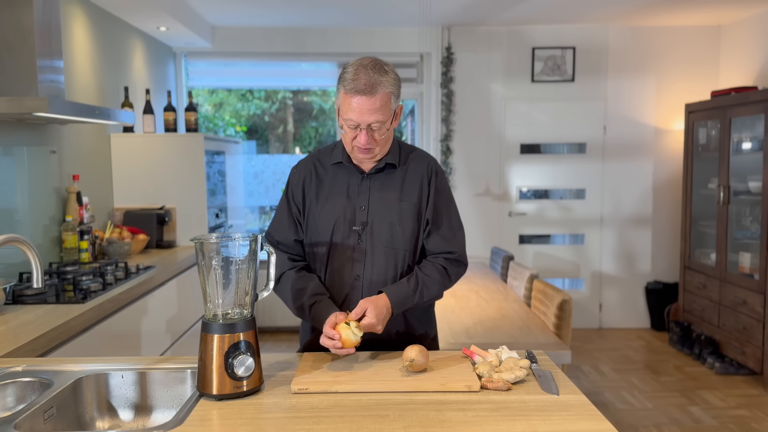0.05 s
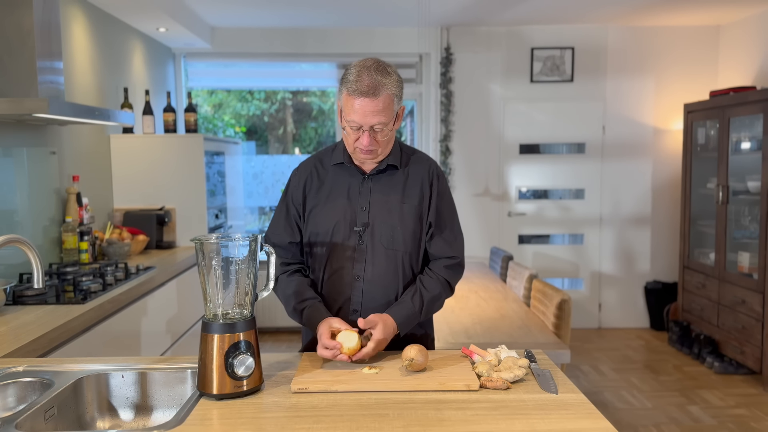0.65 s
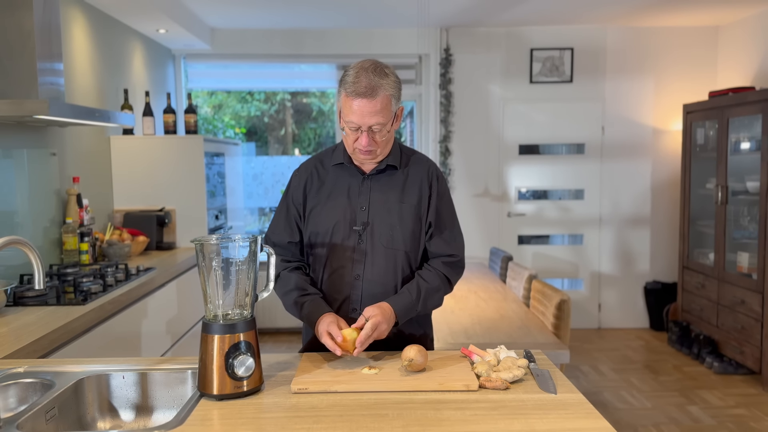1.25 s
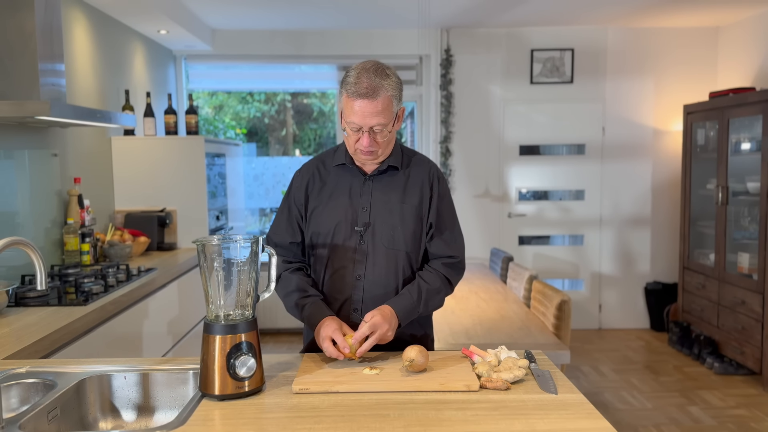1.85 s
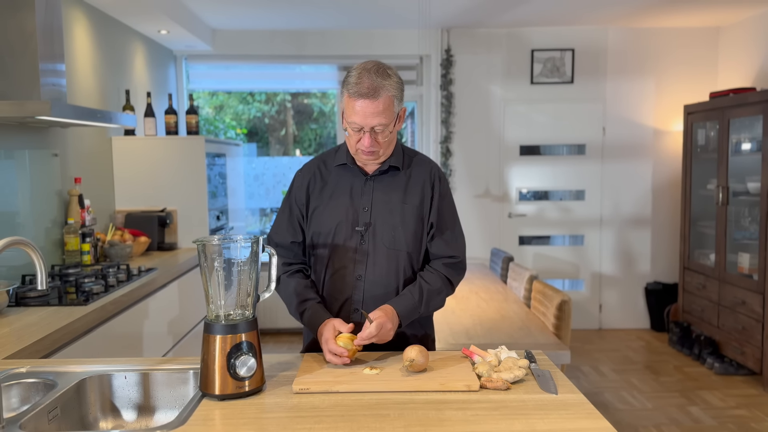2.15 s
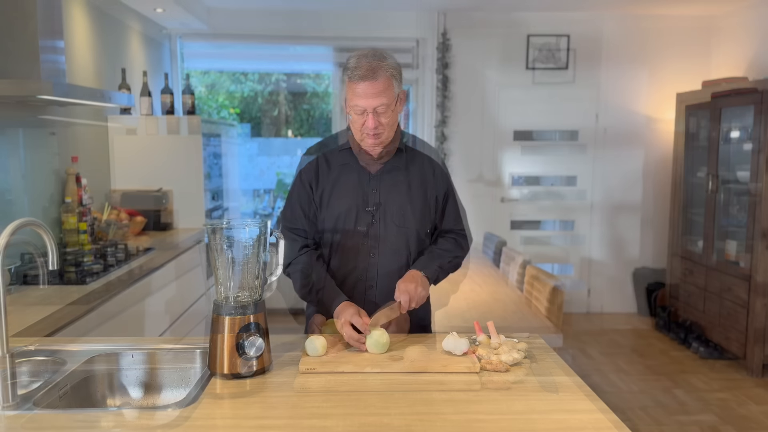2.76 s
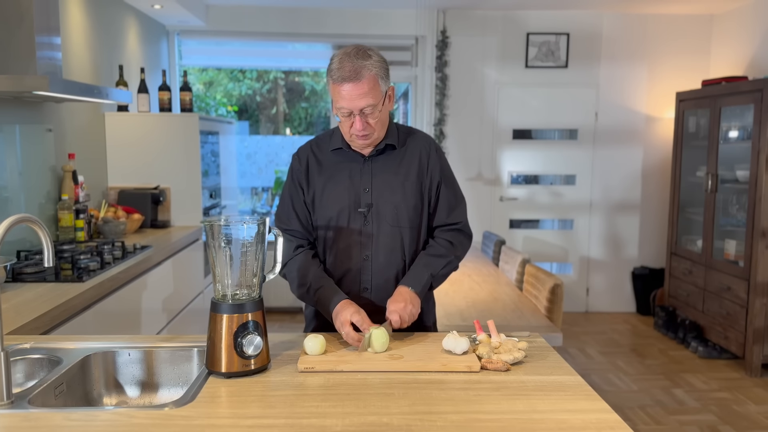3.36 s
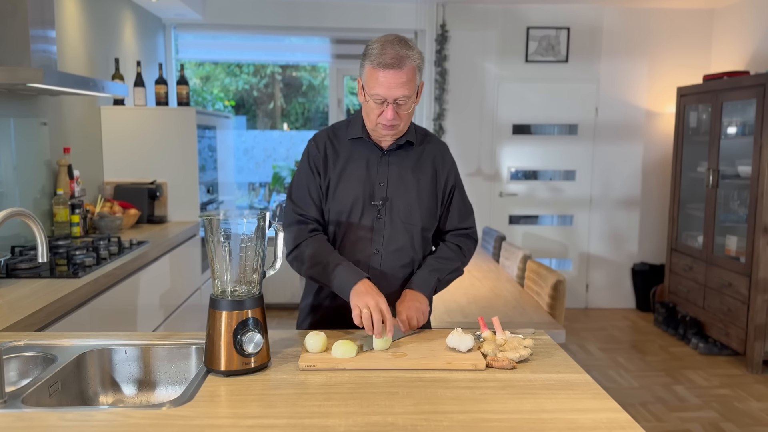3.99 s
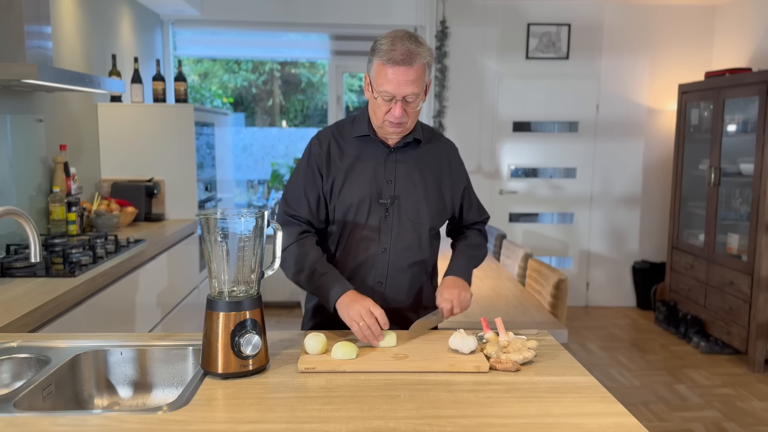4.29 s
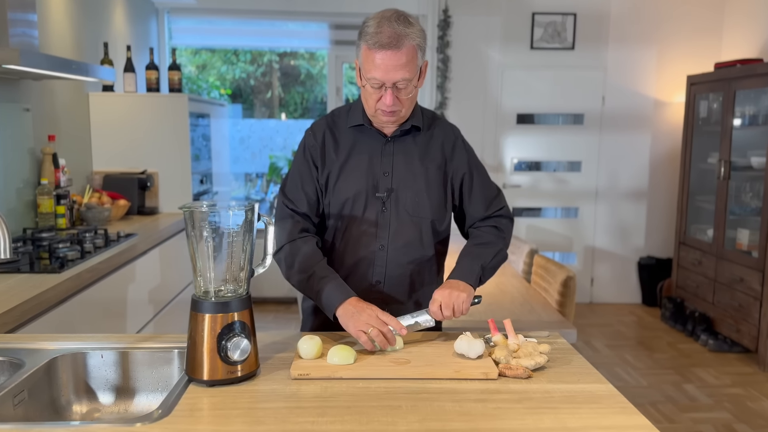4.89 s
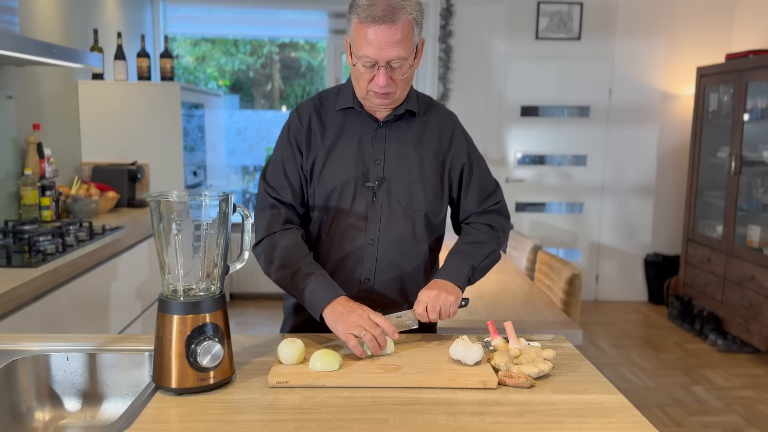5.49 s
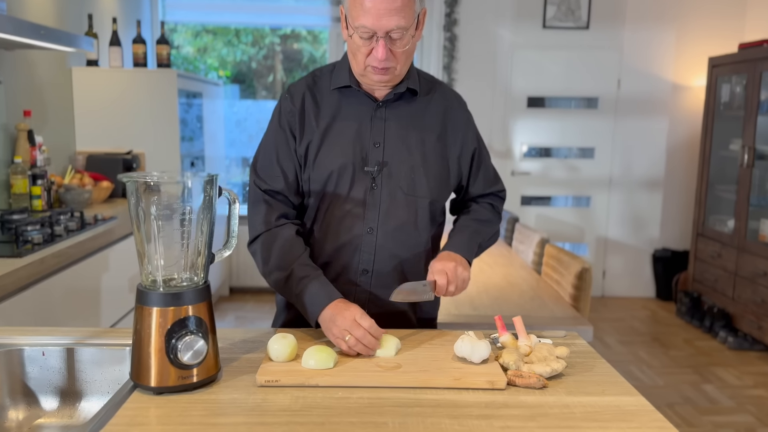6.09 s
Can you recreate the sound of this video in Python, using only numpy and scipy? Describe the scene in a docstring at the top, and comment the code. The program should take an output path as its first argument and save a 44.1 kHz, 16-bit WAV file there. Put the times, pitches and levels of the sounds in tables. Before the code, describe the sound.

Close, papery onion peeling in a kitchen, followed by three crunchy knife cuts that each end in a knock on wood.

```python
"""First a cook peels an onion close by: the dry skin crackles and snaps, and scraps drop on the board.
Near 2.7 s the sound drops out for a moment. From 3.1 s on, a large knife cuts through onion three
times: each crunch swells as the blade sinks and ends in a knock on the wood (3.5, 5.1 and 5.7 s).
Between cuts, sleeves rustle, the halves are set down and the blade slides along the wet onion.
Last, the blade is tugged clear. The kitchen rings on after every blow."""
import sys
import numpy as np
from scipy import signal
from scipy.fft import rfft, irfft
from scipy.io import wavfile
from scipy.ndimage import uniform_filter1d

SR = 44100
rng = np.random.default_rng(int(sys.argv[2]) if len(sys.argv) > 2 else 0)


def wav_out(sig):
    """Save sig, one row per channel (or a flat mono array), as 16-bit PCM at SR to the path in sys.argv[1]."""
    wavfile.write(sys.argv[1], SR, np.round(np.clip(np.atleast_2d(sig).T, -1, 1) * 32767).astype(np.int16))


N = 275184
T = np.arange(N) / SR
HZ = np.fft.rfftfreq(16384, 1 / SR) + 1  # the frequencies on which filters are drawn

# Tone colours. Each row: frequency in Hz, level in dB.
AIR_TONE = [(25, -7), (60, -5.5), (120, -9), (300, -14), (700, -19.5), (2000, -24.5), (6000, -28.5),
            (15000, -34)]
CLOTH_TONE = [(100, -1.5), (400, 2.5), (900, 0), (2300, -5), (4000, -11.5), (15000, -19.5)]
CRUMPLE_TONE = [(100, -33), (350, 0), (700, -0.5), (1150, 9.5), (1600, 7), (2100, 7), (4000, 0), (7000, -6),
                (16000, -18)]
TEAR_TONE = [(500, -21.5), (2500, -13), (4500, -15.5), (7000, -11), (11000, -12.5), (16000, -23)]
RUB_TONE = [(200, 14.5), (900, 1), (1700, -4.5), (3000, -8), (6000, -12), (10000, -13), (15500, -22)]
WET_BLADE_TONE = [(800, -4), (2500, -1), (5000, -4), (8000, -5.5), (11000, -10.5), (15500, -23)]
CRUNCH_TONE = [(200, -13.5), (800, 0), (1600, 2), (2500, -1), (5000, -2.5), (7500, -4), (10000, -4.5),
               (15500, -15)]
STEEL_TICK_TONE = [(40, -1), (90, -2.5), (600, 5), (4000, 5), (7000, -8), (11000, -10.5), (16000, -13.5)]
# The room's echo. Each row: frequency in Hz, ring time in seconds (t60: time to fade 60 dB), level in dB.
KITCHEN_BANDS = [(59.76, 0.88, -7.5), (130, 0.42, 3.5), (280, 0.64, 1), (530, 0.65, -4.5), (740, .6, 2.5),
                 (1000, 0.57, -1.5), (1391, .56, -6), (1800, 0.56, -6), (3000, 0.56, -6.5),
                 (4300, 0.37, -3), (6500, .42, -9), (14000, .32, -11)]

# Smooth movements. Each row: middle in seconds, half length in seconds, level in dB.
ARM_STROKES = [(2.88, 0.2, -70.5), (3.9, .26, -65), (4.45, 0.12, -81.5)]
BLADE_SLIDES = [(4.185, 0.14, -56)]
BLADE_LIFTS = [(5.28, .04, -71.5), (5.925, 0.056, -68), (6.047, 0.029, -66), (6.115, 0.036, -58.5)]
# Onion, peel and hand bump the board. Each row: start in seconds, level in dB, treble limit in Hz,
# tick of the skin in dB.
SOFT_KNOCKS = [(.551, -42, 620, -68), (.592, -42.5, 710, -52.5), (.633, -47.5, 715, -67),
               (.674, -46.5, 875, -73), (2.697, -56.5, 600, -53), (2.867, -40, 250, -65),
               (3.137, -61, 610, -77), (3.76, -52, 141, -68), (3.835, -36.5, 169, -55),
               (3.899, -32.5, 280, -52), (3.924, -37, 300, -76), (4.009, -68, 166, -78),
               (4.062, -43, 200, -68), (4.319, -48, 320, -56), (4.334, -46, 330, -48.5),
               (4.352, -43.5, 400, -57), (4.633, -65, 222, -79.5), (4.801, -46.5, 276, -67),
               (5.456, -39.5, 580, -46)]
# The board's modes (the tones it rings at) under a soft load. Each row: frequency in Hz, ring time in
# seconds, level in dB when knocked, level in dB when shaken through an onion.
DAMPED_MODES = [(124.6, 0.039, 6, -6), (181.3, .06, -2, -8.5), (231, 0.076, 3.5, -4), (343, 0.072, 2.5, 3),
                (428, 0.03, 0.5, 0.5), (548, 0.061, 0, 0.5), (1090, 0.027, 2.5, -6),
                (1278, 0.035, -1.5, -10), (1520, .02, 1.5, -13), (1997, 0.024, -8, -20.5)]

# Fingers turn the onion. Each row: time in seconds, rustle in dB.
FINGER_RUSTLE = [(0, -59.5), (0.32, -72.5), (0.8, -68), (0.94, -73.5), (1.02, -67.5), (1.1, -72.5),
                 (1.38, -67.5), (1.6, -81), (1.68, -85), (1.79, -65.5), (2.25, -58.5), (2.5, -62.5),
                 (2.59, -79), (2.72, -72)]
# Fingers pull the skin. Each row: start in seconds, length in seconds, crumpling in dB, tearing in dB.
SKIN_PULLS = [(0.005, .025, -54.5, -65), (0.026, 0.027, -50.5, -45), (0.088, 0.028, -67, -49.5),
              (0.156, 0.046, -59.5, -55.5), (0.25, 0.03, -64, -57), (0.365, .075, -63, -56),
              (0.562, 0.17, -67.5, -67), (0.695, 0.064, -63, -56.5), (0.77, 0.077, -67, -60.5),
              (0.874, 0.019, -59.5, -63), (1.229, 0.1, -61, -74), (1.481, 0.034, -61, -54),
              (1.541, 0.036, -67.5, -60), (1.712, 0.011, -68, -56.5), (1.761, 0.056, -58, -51.5),
              (1.894, 0.031, -56.5, -48), (1.936, 0.055, -54, -57), (2.003, 0.026, -55, -52.5),
              (2.073, .035, -51, -52.5), (2.102, 0.099, -50, -65), (2.195, .03, -54, -57),
              (2.274, 0.038, -53.5, -50), (2.334, 0.083, -52, -61), (2.45, 0.046, -47.5, -55.5),
              (2.614, .042, -65.5, -61)]
# The main cracks. Each row: start in seconds, pitch of the flake in Hz, its ring in dB, sharp edge in dB.
SKIN_SNAPS = [(0.038, 3040, -42.5, -63), (0.113, 5000, -49.5, -52), (0.17, 4700, -66, -48),
              (0.204, 2100, -45.5, -39), (0.372, 2100, -55, -53), (0.384, 2100, -56, -40),
              (0.48, 6030, -45, -44.5), (0.511, 6100, -47.5, -67), (0.551, 1200, -49, -76),
              (0.567, 5630, -47, -43), (0.595, 1090, -41.5, -72), (0.634, 6300, -52, -44),
              (0.678, 5160, -45, -61), (0.901, 7040, -54.5, -45.5), (1.077, 7300, -52, -66),
              (1.313, 5200, -48.5, -42), (1.373, 6670, -55.5, -47), (1.465, 1550, -52, -50),
              (1.718, 2520, -48.5, -42), (1.7895, 5800, -47, -39), (1.803, 7800, -41, -60),
              (1.844, 5900, -56, -36.5), (1.859, 6000, -46, -58), (1.914, 2060, -42.5, -50),
              (1.973, 3500, -41.5, -34), (2.068, 2940, -46.5, -56), (2.082, 3500, -46.5, -43),
              (2.1, 1640, -40.5, -60), (2.16, 4840, -46, -34), (2.179, 1250, -46, -35.5),
              (2.209, 3800, -43.5, -42), (2.258, 5900, -48, -51), (2.277, 3800, -41, -59),
              (2.292, 4160, -40.5, -42), (2.392, 3800, -40.5, -39.5), (2.46, 2860, -39.5, -54),
              (2.465, 2240, -32, -62), (2.478, 4630, -42, -56), (2.497, 3060, -39, -27.5),
              (2.697, 5550, -54.5, -75), (3.172, 4470, -56.5, -58)]

# The steel's modes. Each row: frequency in Hz, ring time in seconds, level in dB.
BLADE_MODES = [(1656, 0.05, 10), (1970, 0.042, 2), (2320, 0.044, 3), (3740, 0.033, 2), (4170, .06, -14),
               (7500, 0.018, -4), (8550, 0.043, 10), (12400, .01, -27)]
# The blade sinks in. Each row: start in seconds, final crunch in dB, its rise in dB,
# final judder (shaking of the board) in dB, its rise in dB.
KNIFE_CUTS = [(3.133, -55.5, 16.5, -56, 1), (4.9, -49.5, 27.5, -45, 28.5), (5.531, -50, 29, -43, 30.5)]
# The blade lands. Each row: time in seconds, force in dB, treble limit in Hz, place (0 near the end,
# 1 in the middle), steel tick in dB, how far the hand's load stretches the modes apart (0 is not at all).
KNIFE_LANDINGS = [(3.46, 1.5, 6010, 0.042, -32, 0.00096), (5.1142, -10.5, 1250, 0.81, -62, 0.053),
                  (5.734, 2, 7000, 0.9, -30.5, 0)]
# The board's modes under the knife. Each row: frequency in Hz, ring time in seconds,
# level in dB when struck near the end, level in dB when struck in the middle.
BOARD_MODES = [(60, 0.07, 1, 1.5), (128, 0.03, 10.5, 11.5), (240, .035, 21, 19), (361.5, 0.03, 0.5, 29),
               (420.7, 0.017, 9, 27), (540, 0.047, 23.5, 34.5), (693, 0.04, 13, 14.5),
               (820, 0.025, 14.5, 26.5), (952, 0.11, 14.5, 28.5), (1009, 0.04, 23, 26.5),
               (1200, 0.016, 21, 26.5), (1441, 0.029, 19.5, 28.5), (1543, 0.046, 22, 28.5),
               (1833, 0.027, 18.5, 24), (1954, 0.025, 22.5, 24.5), (2318, 0.013, 18, 24.5),
               (2760, 0.015, 16, 20), (2866, 0.02, 23.5, 16.5), (3244, 0.026, 7.5, 11),
               (3400, 0.016, 9.5, 6), (3898, 0.026, 9.5, 3.5), (4040, 0.016, 4.5, -4), (4950, 0.01, -8, 3),
               (5540, 0.008, -13, 5)]

PEELING_END_S, SOUND_RETURNS_S = 2.723, 2.792


def undb(db):
    """Turn decibels into a gain, a number to multiply by."""
    return 10 ** (np.asarray(db) / 20)


def unit(x):
    """Scale to an average strength (rms) of 1."""
    return x / np.sqrt(np.mean(x ** 2))


def sized(x, db, span_s):
    """Give a short sound the energy of a level db held for span_s."""
    return x * undb(db) * np.sqrt(span_s * SR / np.sum(x ** 2))


def add(out, s, x):
    """Mix x into out, starting at s seconds."""
    i = max(int(s * SR), 0)
    out[i:i + len(x)] += x[:N - i]


def convolve(x, response):
    """Pass x through an object or a room."""
    return signal.fftconvolve(x, response)[:len(x)]


def tap_response(gain, travel_s=0):
    """How an object with this gain over HZ answers a tap. Low tones lag; travel_s is the lag at 1 kHz."""
    cepstrum = irfft(np.log(gain + 1e-9 * gain.max()))
    half = len(cepstrum) // 2
    cepstrum[1:half] *= 2  # fold it so that nothing sounds before the tap
    cepstrum[half + 1:] = 0
    lag = 4 * np.pi * travel_s * np.sqrt(1000 * HZ)
    return irfft(np.exp(rfft(cepstrum) - 1j * lag))


def colour(x, tone):
    """Give x a tone colour from a table."""
    hz, db = np.transpose(tone)
    gain = undb(np.interp(np.log(HZ), np.log(hz), db))
    return convolve(x, tap_response(gain))


def soften(x, hz, order, kind="low"):
    """Keep only the low tones, or one band of tones."""
    return signal.sosfilt(signal.butter(order, hz, kind, fs=SR, output="sos"), x)


def resonances(hz, t60, db):
    """Gain over HZ with a peak for each mode; a shorter ring makes a wider peak."""
    sharpness = hz * t60 * np.pi / np.log(1000)
    detune = sharpness[:, None] * (HZ / hz[:, None] - hz[:, None] / HZ)
    return np.sqrt(undb(db) ** 2 @ (1 + detune ** 2) ** -1.5)


def contact(limit_hz, steep):
    """Gain over HZ of a blow: a longer, softer one hardly wakes the high modes."""
    return 1 / np.sqrt(1 + (HZ / limit_hz) ** steep)


def burst(t60):
    """A puff of noise that dies away, like a cluster of tiny breaks."""
    t = T[:SR // 20]
    return rng.standard_normal(len(t)) * np.exp(-np.log(1000) * t / t60)


def grains(rate, spread_db):
    """Random clicks of unequal size, about rate of them a second."""
    happens = rng.random(N) < rate / SR
    size = undb(spread_db * np.minimum(rng.standard_normal(N), 2))
    return unit(happens * size * rng.choice([-1, 1], N))


def flutter(rate, depth_db):
    """A gain that wobbles at random, rate times a second."""
    steps = np.clip(rng.standard_normal(N // 4), -2, 2)
    return unit(undb(depth_db * np.interp(T * rate, np.arange(len(steps)), steps)))


def press(s, length_s, attack_s, release_s):
    """Gain over time of a push that builds, holds and dies away."""
    return np.clip((T - s) / attack_s, 0, 1) * np.exp(-np.maximum(T - s - length_s, 0) / release_s)


def strokes(table):
    """Gain over time of movements that speed up and slow down again."""
    return sum(undb(db) * np.exp(-((T - s) / half_s) ** 2) for s, half_s, db in table)


def room_air():
    """The air in the room makes a faint, steady, low noise."""
    return undb(-77) * unit(colour(rng.standard_normal(N), AIR_TONE))


def kitchen_echo(first_s=0.0056, build_s=0.0015):
    """Many reflections build up quickly, then fade, the treble first."""
    t = T[:SR]
    hz, t60, db = np.transpose(KITCHEN_BANDS)
    spectrum, log_hz = rfft(rng.standard_normal(SR)), np.log(np.arange(SR // 2 + 1) + 1)
    echo = 0
    for band, band_t60, band_db in zip(np.eye(len(hz)), t60, db):
        noise = irfft(spectrum * np.interp(log_hz, np.log(hz), band))
        fade = np.clip((t - first_s) / build_s, 0, 1) * np.exp(-np.log(1000) * t / band_t60)
        echo = echo + undb(band_db) * noise * fade / np.linalg.norm(fade)
    return echo


def sleeves():
    """Cloth brushes on cloth as the arms move."""
    movement = strokes(ARM_STROKES) * flutter(rate=25, depth_db=0.5)
    return movement * unit(colour(rng.standard_normal(N), CLOTH_TONE))


def thuds():
    """Soft things land with a long push that wakes mostly low modes; light ones give less bass."""
    wood, ticks = np.zeros(N), np.zeros(N)
    hz, t60, db, _ = np.transpose(DAMPED_MODES)
    board = resonances(hz, t60, db)
    for s, level_db, limit_hz, tick_db in SOFT_KNOCKS:
        bass_cut = HZ / np.hypot(HZ, min(0.87 * limit_hz, 330))
        thud = tap_response(board * contact(limit_hz, steep=6.54) * bass_cut, travel_s=0.00033)
        add(wood, s, sized(thud, level_db, span_s=0.0048))
        tick = soften(burst(t60=0.038), min(9 * limit_hz, SR / 3), order=1)
        add(ticks, s, sized(tick, tick_db, span_s=0.0045))
    return wood + colour(ticks, CRUNCH_TONE)


def fingers():
    """How strongly the skin crumples and tears over time: separate pulls above a light rustle."""
    rustle = undb(np.interp(T, *np.transpose(FINGER_RUSTLE))) * (T < PEELING_END_S)
    crumple, tear = rustle, rustle * undb(2.5)
    for s, length_s, crumple_db, tear_db in SKIN_PULLS:
        pull = press(s, length_s, attack_s=0.011, release_s=0.015)
        crumple = np.maximum(crumple, undb(crumple_db) * pull)
        tear = np.maximum(tear, undb(tear_db) * pull)
    return crumple, tear


def flake_shower(tone, rate, spread_db, patchy_db):
    """Tiny flakes break: each size rings in its own band, and patchy_db makes it come in spurts."""
    hz, db = np.transpose(tone)
    shared, shower = grains(rate, spread_db), 0
    for centre_hz in np.geomspace(250, 14000, 12):
        clicks = (0.27 * shared + 1.5 * grains(rate, spread_db)) * flutter(rate=84, depth_db=patchy_db)
        band = soften(clicks, [centre_hz / 1.2, centre_hz * 1.2], order=2, kind="band")
        shower = shower + undb(np.interp(np.log(centre_hz), np.log(hz), db)) * band
    return unit(shower)


def peeling(crumple, tear):
    """Dry skin gives way in fits and starts; each fit is a shower of tiny breaks."""
    fits = flutter(rate=330, depth_db=4.0)
    crackle = flake_shower(CRUMPLE_TONE, rate=2900, spread_db=4.5, patchy_db=3.5)
    hiss = flake_shower(TEAR_TONE, rate=5000, spread_db=16, patchy_db=0.0)
    return fits * (undb(-0.5) * crumple * crackle + undb(-3.5) * tear * hiss)


def small_cracks(crumple, tear, per_second=55, spread_db=5.5, most_db=-48.5):
    """Random rows like those of SKIN_SNAPS: the harder the pull, the louder the crack."""
    gap, pitch, ring, edge = rng.random((300, 4)).T
    s = np.cumsum(2 * gap / per_second)
    low_hz, high_hz = 1670, 7800
    hz = low_hz * (high_hz / low_hz) ** pitch

    def level(pull, chance, boost_db):
        pull_db = 20 * np.log10(np.interp(s, T, pull) + 1e-9)
        luck_db = spread_db * np.sqrt(12) * (chance - 0.5)
        return np.minimum(pull_db + luck_db + boost_db, most_db)  # a small flake can only take so much

    rows = np.column_stack([s, hz, level(crumple, ring, boost_db=4), level(tear, edge, boost_db=3)])
    return rows[s < PEELING_END_S]


def snaps(cracks):
    """Each crack has a sharp edge and a brief ring from the flake that broke."""
    flakes, edges = np.zeros(N), np.zeros(N)
    for s, hz, ring_db, edge_db in cracks:
        peak = signal.iirpeak(hz, Q=2.84, fs=SR)
        flake = signal.lfilter(*peak, signal.lfilter(*peak, burst(t60=0.0066)))
        add(flakes, s, sized(flake, ring_db, span_s=0.0017))
        add(edges, s, sized(burst(t60=0.0083), edge_db, span_s=0.015))
    return flakes + colour(edges, TEAR_TONE)


def sliding():
    """Steel rubs on wet onion: it rasps and sings as it slides, and is lifted out in short tugs."""
    steel = tap_response(resonances(*np.transpose(BLADE_MODES)))
    singing = unit(convolve(grains(rate=8500, spread_db=-2), steel))
    rasp = 0
    for _ in range(3):  # the contact wanders, so groups of weaker modes come and go
        hz = rng.uniform(1000, 15500, 45)
        group = tap_response(resonances(hz, t60=0.03, db=3 * rng.standard_normal(len(hz))) + 0.1)
        rasp = rasp + convolve(grains(rate=3300, spread_db=5), group) * flutter(rate=46, depth_db=6.5)
    rub = undb(-1.0) * unit(colour(rasp, RUB_TONE)) + undb(-9.5) * singing
    wet_clicks = undb(2) * grains(rate=3800, spread_db=4)
    wet = unit(colour(unit(rasp) + wet_clicks, WET_BLADE_TONE))
    return strokes(BLADE_SLIDES) * rub + strokes(BLADE_LIFTS) * wet


def sinking():
    """How strong crunch and judder are over time: both grow as the blade sinks and end when it lands."""
    crunch, judder = 0, 0
    for cut, (lands_s, *_) in zip(KNIFE_CUTS, KNIFE_LANDINGS):
        s, crunch_db, crunch_rise_db, judder_db, judder_rise_db = cut
        uncut = np.clip((lands_s - T) / (lands_s - s), 0, 1)
        push = press(s, lands_s - s, attack_s=0.008, release_s=0.0073)
        # the rise levels off as the whole edge bites, sooner for the judder
        crunch = crunch + push * undb(crunch_db - crunch_rise_db * uncut ** 1.6)
        judder = judder + push * undb(judder_db - judder_rise_db * uncut ** 2)
    return crunch, judder


def slicing():
    """Cells burst along the edge, and the blade's small slips shake the board through the onion."""
    crunch, judder = sinking()
    cells = unit(colour(grains(rate=9800, spread_db=5), CRUNCH_TONE)) * flutter(rate=180, depth_db=0.5)
    hz, t60, _, db = np.transpose(DAMPED_MODES)
    board = tap_response(resonances(hz, t60, db), travel_s=0.00092)
    slips = judder * grains(rate=1200, spread_db=2.5)
    return crunch * cells + convolve(slips, board / np.linalg.norm(board))


def chops(main_mode_hz=540):
    """The edge hits the wood and the board rings. Gives the direct sound and what fills the room."""
    wood, all_round, ticks = np.zeros(N), np.zeros(N), np.zeros(N)
    hz, t60, end_db, middle_db = np.transpose(BOARD_MODES)
    for s, force_db, limit_hz, place, tick_db, stretch in KNIFE_LANDINGS:
        loaded_hz = hz * (hz / main_mode_hz) ** stretch
        db = force_db + end_db + place * (middle_db - end_db)
        # heard from all sides at once, the board's peaks are wider
        for out, ring_s in ((wood, t60), (all_round, t60 / 1.8)):
            modes = resonances(loaded_hz, ring_s, db) * contact(limit_hz, steep=6)
            # start early, so the fastest waves in the wood arrive with the steel's tick
            add(out, s - 0.0013, tap_response(modes, travel_s=0.0023))
        add(ticks, s, sized(burst(t60=0.02), tick_db, span_s=0.014))
    steel = colour(ticks, STEEL_TICK_TONE)
    return wood + steel, undb(-2.0) * all_round + steel


def scene():
    """Hands and onion are close by; each sound also sends a share into the kitchen's echo."""
    crumple, tear = fingers()
    skin = peeling(crumple, tear) + snaps(SKIN_SNAPS) + snaps(small_cracks(crumple, tear))
    cutting = slicing() + sliding() + sleeves()
    bumps = thuds()
    knocks, all_round = chops()
    into_room = undb(-10.5) * skin + undb(-5.5) * cutting + undb(-6.0) * all_round + undb(-4.5) * bumps
    echo = convolve(into_room, kitchen_echo())
    return (skin + cutting + knocks + bumps + echo + room_air())[None]


def record(dry):
    """The sound drops out briefly after the peeling; peaks stop at full scale; the top treble is cut."""
    sound_on = uniform_filter1d(1.0 * ((T < PEELING_END_S) | (T > SOUND_RETURNS_S)), size=100)
    treble_cut = signal.ellip(8, 0.2, 70, 15900, fs=SR, output="sos")
    return signal.sosfilt(treble_cut, np.clip(dry * sound_on, -1, 1))


dry = scene()
out = record(dry)
wav_out(out)
```